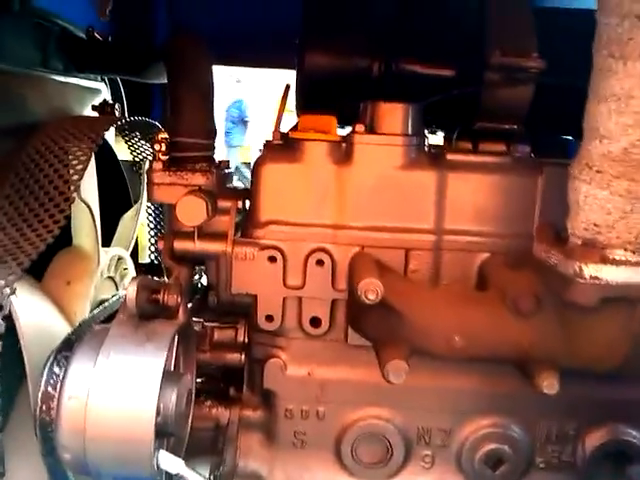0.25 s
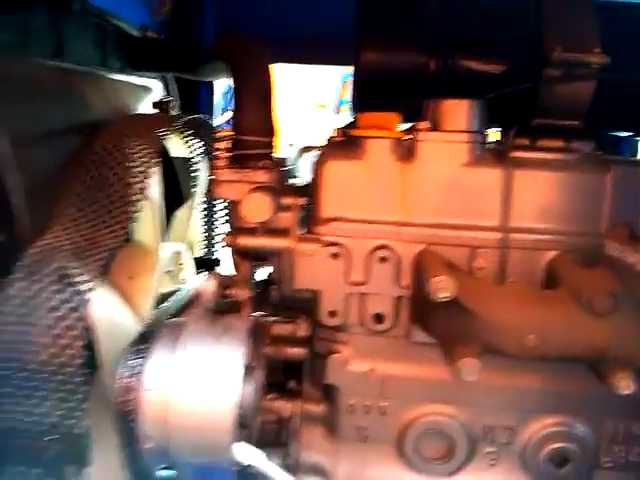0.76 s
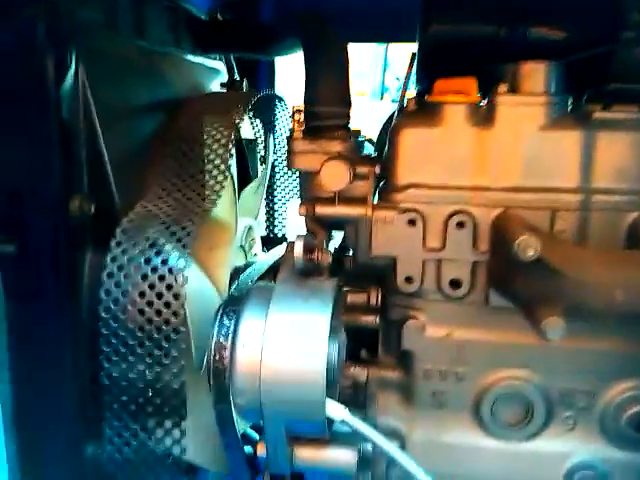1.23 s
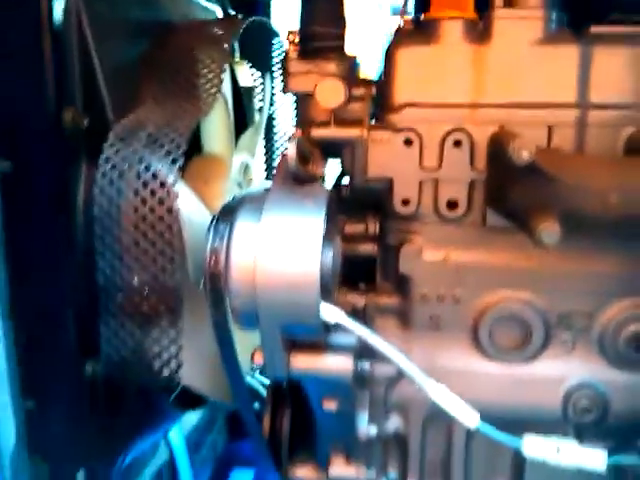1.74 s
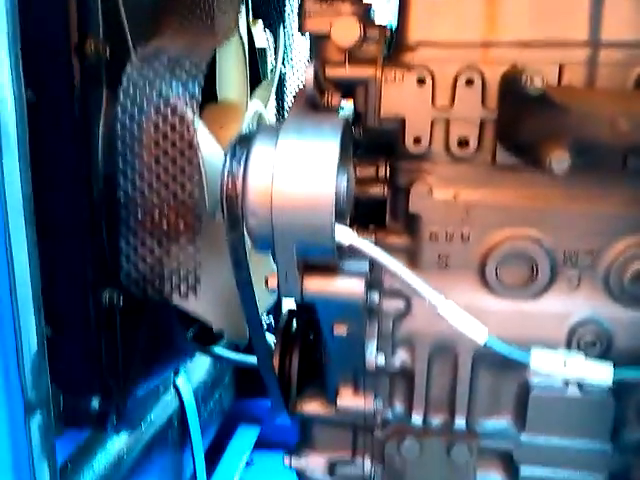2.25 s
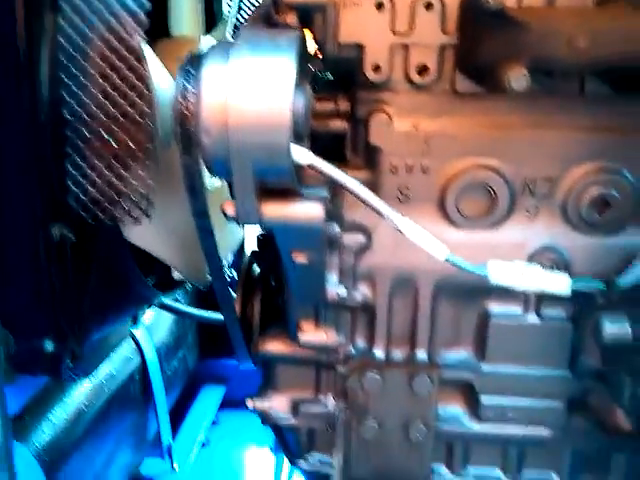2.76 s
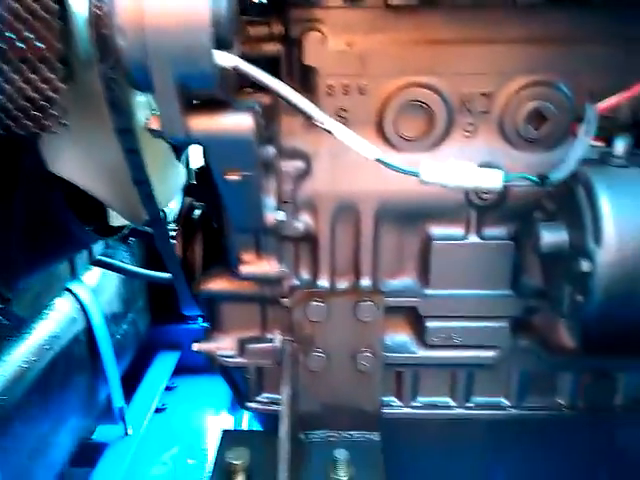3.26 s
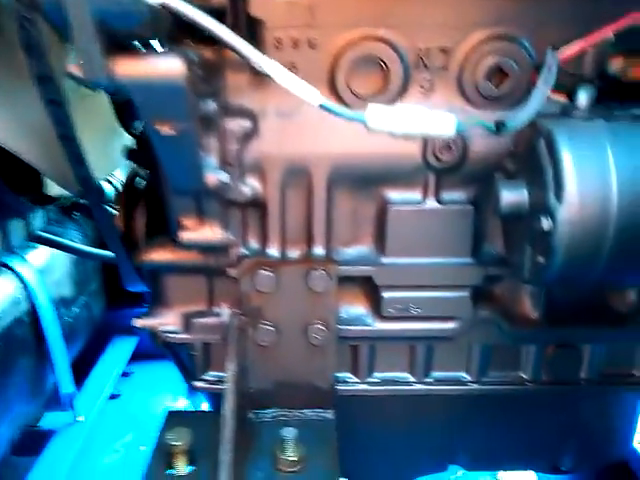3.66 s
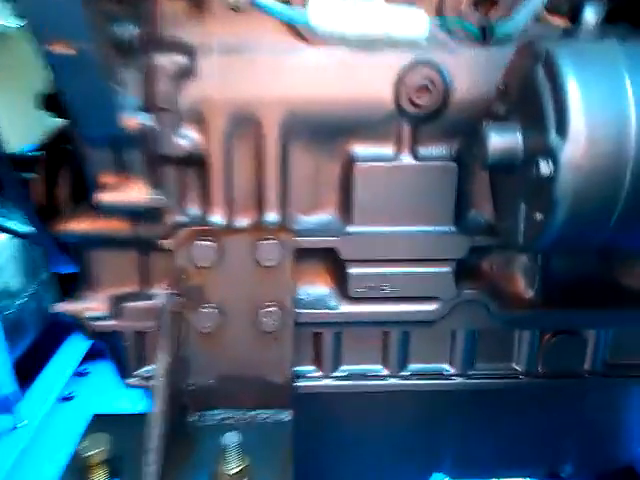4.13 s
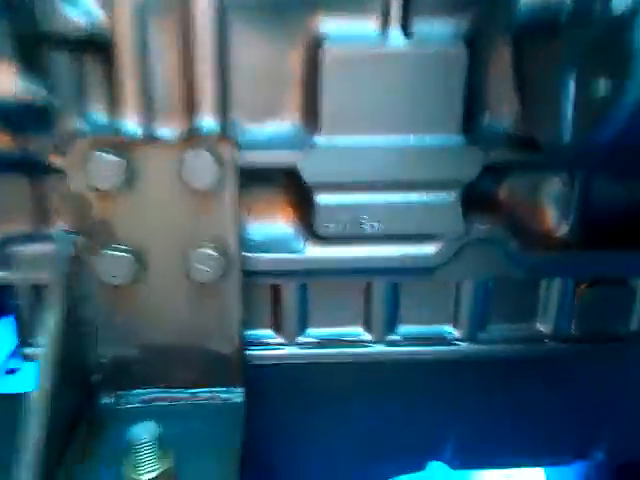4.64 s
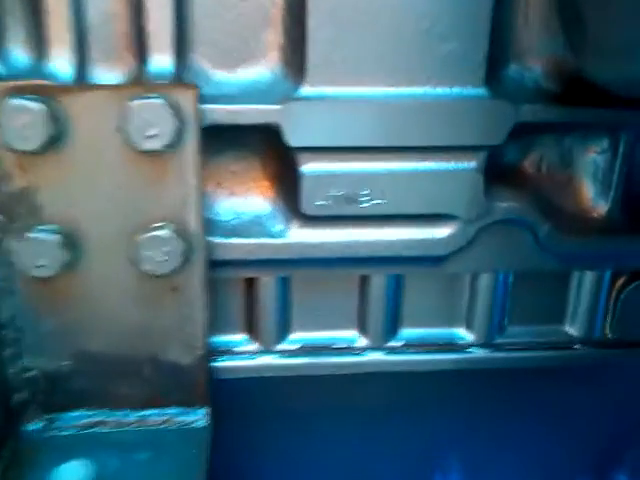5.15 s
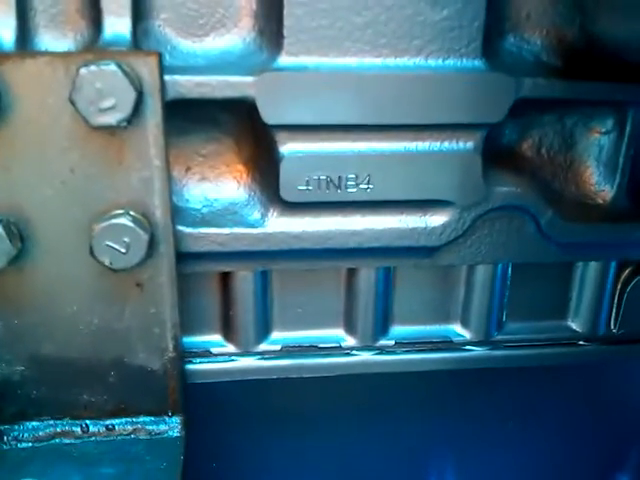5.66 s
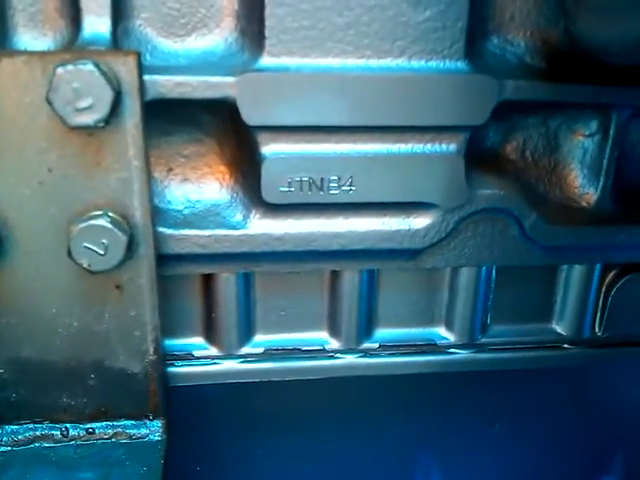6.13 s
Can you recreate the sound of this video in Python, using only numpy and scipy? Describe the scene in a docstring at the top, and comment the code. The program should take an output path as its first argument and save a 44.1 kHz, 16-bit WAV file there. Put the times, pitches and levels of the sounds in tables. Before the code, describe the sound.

A diesel engine idles evenly in a hall, its fast metal ticks rattling in groups of three about fourteen times a second. Behind it lies a steady fan-like noise wash and a deep hum that creeps upward, swelling and sinking, then weakening. Soft knocks join in. Past the middle, a shoe scrapes gritty floor right by the microphone, sharp and crackling. The slightly dull handheld microphone moves along the engine, so the ticking changes colour.

```python
"""A diesel engine idles evenly in a yard hall: tones locked to the exhaust puffs, and three metal ticks each
crank turn, made by noise rattles ringing casing modes as the microphone moves along the engine.
Behind it lies a steady noise wash; nearby, a deeper hum of two tones creeps up in pitch and swells and sinks,
weaker later. Noise-burst knocks and low swings join the ticks, and a shoe scuffs gritty floor close to the
microphone: ringing grains, with single cracks for the larger grit."""
import sys
import numpy as np
from scipy import signal
from scipy.io import wavfile
from scipy.ndimage import uniform_filter1d

SR = 44100
rng = np.random.default_rng(int(sys.argv[2]) if len(sys.argv) > 2 else 0)


def persist_wave(psi):
    """Save psi, clipped to +-1, as 16-bit WAV."""
    counts = np.round(np.clip(psi, -1, 1) * 32767).astype(np.int16)
    wavfile.write(sys.argv[1], SR, np.atleast_2d(counts).T)


N = 281799  # samples

# Colour of the wash in the hall: pitch_hz, relative level_db per Hz
WASH = [(8.8, -30), (15, -1), (66, -7), (120, -15), (235, -18.5), (275, -21), (339, -20.5), (632, -21),
        (1270, -23.5), (2380, -30.5), (3000, -28), (3330, -32.5), (4550, -34), (6540, -42), (7450, -48),
        (9680, -68.5), (16400, -120)]
# Broad lifts in the wash: centre_hz, width_hz, lift_db
HALL = [(348, 42, 7.5), (471, 49, 6), (2020, 230, 2.5), (3050, 110, 2.5), (3860, 330, 2), (6850, 1860, 9)]
# Slow swell of the wash: time_s, low_db (times 1.5 under 1 kHz, 0.5 over 2 kHz), treble_db (full over 2 kHz)
WASH_SWELL = [(0, -1.5, 0), (.7, -0.5, -1), (1.3, -1.5, 1.5), (1.9, 0.5, 1.5), (2.5, 0, -0.5), (3, -0.5, 1),
              (3.6, -0.5, -1.5), (4.2, -1.5, 1.5), (4.9, -1, -1.5), (5.5, -0.5, 1), (6.39, 0, -1)]
# The hum swells and sinks several times, weaker later: time_s, low_tone_db (rms), upper_tone_db (rms)
HUM = [(0, -39, -56), (.2, -43.5, -51.5), (.55, -36, -58.5), (1.3, -44, -53), (1.8, -40.5, -59),
       (2.2, -39, -57), (2.8, -44, -65), (3.4, -45.5, -76), (3.7, -48, -67), (4.05, -44.5, -56),
       (4.5, -45, -63), (5.1, -60.5, -62), (5.6, -52.5, -58), (5.95, -49, -55), (6.39, -52, -61)]
# Low bumps: centre_s, peak_db, pitch_hz
BUMPS = [(2.896, -40, 44.5), (3.95, -34.5, 41.13)]
# Broad knocks, some together with a tick: start_s, level_db (rms before the fade), centre_hz
KNOCKS = [(1.279, -47.5, 3840), (1.812, -51, 4700), (2.374, -53.5, 4500), (2.9492, -53, 1000),
          (2.958, -55, 5000), (3.539, -50, 3000), (4.124, -54.5, 3040)]
# The sole catches three times, then slides: time_s, hiss_db, sole_rumble_db
SCUFF = [(4.518, -86, -60), (4.524, -45.5, -54.5), (4.545, -52, -49.5), (4.565, -45.5, -43.5),
         (4.585, -54, -66), (4.602, -43.5, -54), (4.618, -50.5, -52), (4.651, -39, -57),
         (4.655, -38.5, -53), (4.677, -30.5, -59), (4.685, -42.5, -50.5), (4.71, -37, -59),
         (4.735, -35.5, -56), (4.77, -41, -47), (4.799, -44, -47.5), (4.81, -53, -55), (4.85, -66, -70)]
# Larger grit cracking under the sole: start_s, level_db, pitch_hz
GRIT = [(4.5228, -40, 5500), (4.5597, -33, 5270), (4.596, -23.5, 5900), (4.603, -24, 5900),
        (4.6038, -27.5, 3050), (4.626, -42, 5560), (4.639, -29, 3500), (4.6431, -19, 6000),
        (4.655, -16.5, 5500), (4.658, -21, 5500), (4.6637, -18, 5640), (4.6693, -22, 5930),
        (4.6732, -22, 5200), (4.702, -31, 4080), (4.7158, -37, 2630), (4.7357, -25, 3180),
        (4.737, -21, 4840), (4.752, -30, 3580), (4.7688, -24, 2400), (4.797, -39, 4500)]
# Modes of sole and floor: pitch_hz, width_hz, relative level_db
SOLE = [(159, 30, -6), (318, 32, 1.5), (493, 45, -0.5), (536, 27, -4), (724, 160, -2), (957, 63, -5)]
# Exhaust tones as multiples of the crank turn
MULTIPLES = [2, 4, 5, 6, 8, 9, 10, 11, 12, 14, 15, 16, 17, 18, 19, 21, 23]
# Each exhaust tone: start_level_db (rms), change_db_per_s as the microphone moves
ORDERS_DB = [(-66, 0.5), (-58.5, 0), (-60.5, 0.2), (-61, 0.17), (-70, 0), (-72, -2), (-69, 0),
             (-63.5, 0.74), (-76, -0.5), (-78, -2), (-85.5, 1.5), (-65, -0.6), (-81.5, 2), (-85.5, 1.5),
             (-87, 1.46), (-83, 0.5), (-76.5, 0.5)]
# Place of each of the three ticks within the crank turn: place_turns
TICK_AT = [.522, .652, .787]
# Ticks as the microphone moves along the engine:
# time_s, first_tick_db, last_tick_db, brightness_db_per_octave (about 3400 Hz)
TICKS = [(0, -54, -58, -10), (.25, -44.5, -61, -9), (.72, -58, -52.5, -2.5), (.88, -45, -50, -1),
         (1.1, -48.5, -56, -0.5), (1.4, -52.5, -56, -0.5), (1.65, -48.5, -64, -0.5), (1.8, -52, -47.5, -1),
         (2.4, -51.5, -54.5, 0.5), (3.25, -53, -51, -4), (3.5, -51, -59, -4.5), (4.0, -54, -67, 4),
         (4.35, -48.5, -57.5, -11), (5.0, -54.5, -61.5, 3.5), (5.55, -51.5, -62, 6.5), (6.0, -54, -70, 6),
         (6.39, -53, -57, 4)]
# Modes of the engine's casing: pitch_hz, width_hz (per smoothing pass), relative level_db,
# panel_number (0 sump, 1 side cover, 2 block, 3 a panel whose facing stays constant)
METAL = [(1842, 95, -14, 0), (2140, 190, -10.5, 0), (2677, 180, -9.5, 1), (3060, 220, -7.5, 2),
         (3682, 220, -6.5, 3), (4460, 300, -5, 3), (4740, 280, -8.5, 3), (5500, 400, -10.5, 3),
         (6040, 550, -8.5, 3), (6590, 700, -8, 3)]
# How well three panels face the moving microphone: time_s, sump_db, side_cover_db, block_db
FACING = [(0, -8, -7.5, -7), (.8, -11, 0.5, 2), (1.45, -11, 2.5, 5), (2, -1, 2.5, -2), (3, -4.5, 2, 3.5),
          (3.6, 6.5, 4.5, 5.5), (4.4, -4, -4.5, 2), (5.1, 10.5, 4.5, 6.5), (5.55, 13.5, 9, 6.5),
          (5.9, 15, 6, 6), (6.39, 11, 1, -5)]
# Ticks that stand out: start_s, level_db, lower_ring_hz, upper_ring_hz, upper_against_lower_db
LOUD = [(0.178, -53.5, 2740, 4340, 1), (0.249, -52.5, 2710, 3820, 3), (0.32, -52, 2940, 3770, -12),
        (0.8778, -49.5, 2920, 3900, 2), (0.898, -50, 3000, 4550, 0), (0.9524, -52, 3690, 4650, 0),
        (0.9687, -58, 3200, 4730, 7), (1.0198, -55, 2880, 3670, -14), (1.0386, -53, 2730, 4800, -0.5),
        (1.0902, -51, 2910, 4540, -5), (1.158, -50, 2920, 4350, -11), (1.2318, -44.5, 2880, 3750, -9.5),
        (1.3704, -49.5, 3170, 4400, -7), (1.3923, -58, 3080, 4320, -4), (1.441, -54, 3020, 4310, 0),
        (1.742, -49.5, 3620, 4450, -2), (1.951, -50, 3000, 3700, -7), (2.163, -50, 2980, 4220, -3),
        (2.2354, -51, 3600, 4250, 1), (2.325, -55.5, 2030, 4360, 5), (2.447, -57, 2540, 3660, -1),
        (2.5157, -48.5, 2940, 4120, -7), (2.586, -53, 2960, 3400, -5), (2.8496, -48.5, 2800, 4600, -6),
        (3.2883, -54, 3060, 3730, -5), (3.365, -52, 3260, 3560, -10), (3.4817, -50, 2860, 4400, -15),
        (3.625, -50, 2950, 4720, -11), (3.6909, -51, 2060, 4300, -1.5), (3.8332, -61, 2830, 4770, 6),
        (3.901, -47, 2830, 4470, -27), (4.0436, -54.5, 2980, 3780, -3), (4.1855, -46.5, 2870, 4330, -16),
        (4.324, -46.5, 2970, 4730, -9.5), (5.0995, -55, 2810, 4840, 1), (5.31, -52, 3130, 4740, 1),
        (5.3813, -47, 2790, 3810, -10), (5.4493, -47, 2950, 6440, -11), (5.5183, -51, 2640, 4480, -3),
        (5.5903, -46, 3060, 3380, -6), (5.6614, -52, 1930, 3550, -7), (5.7325, -50, 2950, 6230, -8),
        (5.8729, -49, 2220, 3940, -1), (5.942, -49.5, 3190, 3900, -5), (6.0114, -47.5, 3230, 3890, -11),
        (6.0813, -56, 2060, 3840, -1), (6.153, -51, 2600, 4700, -13), (6.295, -45.5, 2210, 4720, -8.5),
        (6.3644, -49.5, 3070, 3900, -12)]

WASH_DB = -53  # rms of the whole wash
CLIMB_S = 3.6  # time constant of the hum's climb
HUM_FROM_HZ, HUM_TOWARD_HZ = 47.35, 53.46
UPPER_FROM_HZ, UPPER_TOWARD_HZ = 73, 86.3
WAVER_HZ = .15  # rms wander of both hum tones
KNOCK_T60_S = 0.29
SLIDE_HZ, SLOWING_S = (5600, 2730), (4.698, 4.78)  # slide brightness before and after the foot slows
CRANK_HZ = 14.2254
PUFF_AT, PUFF_LEAD = .61, .32  # turns: place of the one puff a turn, and the lead of its swing
TICK_SPREAD_DB = 1.5  # rms chance in each tick's level
MIDDLE_DB = 0.5  # the middle tick against the mean of the others
FOCUS_DB = -36.5  # per octave: how fast modes fall silent away from a loud tick's rings
REPEAT_DB = -4.5  # the last tick answering a loud first tick on the same rings
EDGE_HZ = 7560  # band limit
OFFSET = .0009  # of full scale


def gain_of(db):
    """Decibels to gain."""
    return 10 ** (np.asarray(db) / 20)


def evened(x):
    """Scales to rms 1."""
    return x / np.sqrt(np.mean(x ** 2) + 1e-20)


def curves(rows, t):
    """Columns of a table read at times t, with straight lines between rows."""
    s, *columns = np.transpose(rows)
    return [np.interp(t, s, c) for c in columns]


def drift(rate_hz, t):
    """Slow wander of rms 1: sines of random phase up to the given rate, the slower ones stronger."""
    rates = np.geomspace(rate_hz / 20, rate_hz, num=20)
    return evened(sum(np.sin(2 * np.pi * (f * t + rng.random())) / np.sqrt(f) for f in rates))


def resonate(x, hz, width_hz):
    """Shifts hz down to zero, smooths, and shifts back: a resonance of gain 1."""
    turn = np.exp(2j * np.pi * np.cumsum(hz * np.ones(len(x))) / SR)
    r = np.exp(-np.pi * width_hz / SR)
    return 2 * (turn * signal.lfilter([1 - r], [1, -r], x / turn)).real


def add(mix, start_s, sound):
    """Mixes a sound in from start_s, cut at the end of the mix."""
    part = mix[round(start_s * SR):][:len(sound)]
    part += sound[:len(part)]


def blurred(x, bins, frames):
    """Random patches of rms 1, averaged over neighbouring frequency bins and time frames."""
    x = uniform_filter1d(x, size=bins, axis=0)
    return evened(uniform_filter1d(x, size=frames, axis=1))


def wash():
    """Fan and engine noise spread by the hall: random spectra with drifting patches."""
    frames, hz = N // 512 + 5, np.fft.rfftfreq(2048, 1 / SR)
    a, b, patches, bands = rng.standard_normal((4, len(hz), frames))
    patches = blurred(patches, 14, 10)
    bands = blurred(bands, 2, 40)  # narrow bands that linger

    f, db = np.transpose(WASH)
    colour = np.interp(np.log(hz + 1), np.log(f + 1), db)
    colour += sum(lift / (1 + (2 * (hz - centre) / width) ** 2) for centre, width, lift in HALL)

    low_db, high_db = curves(WASH_SWELL, np.arange(frames) * 512 / SR)
    treble = np.clip(np.log2((hz + 1) / 1000), 0, 1)[:, None]  # 0 under 1 kHz, 1 over 2 kHz
    swell = (1.5 - treble) * low_db + treble * high_db
    flicker = 1.7 * treble * patches + (2.2 + 1.1 * treble) * bands
    spectra = (a + 1j * b) * gain_of(colour[:, None] + swell + flicker)
    noise = signal.istft(spectra, nperseg=2048, noverlap=1536)[1][:N]
    return gain_of(WASH_DB) * evened(noise)


def hum(t):
    """Two tones creeping up in pitch, each slowing toward its goal; the lower has a faint octave."""
    db, upper_db = curves(HUM, t)
    climb, waver = 1 - np.exp(-t / CLIMB_S), WAVER_HZ * drift(3., t)
    low_hz = HUM_FROM_HZ + (HUM_TOWARD_HZ - HUM_FROM_HZ) * climb + waver
    upper_hz = UPPER_FROM_HZ + (UPPER_TOWARD_HZ - UPPER_FROM_HZ) * climb + waver
    low_phase = 2 * np.pi * np.cumsum(low_hz) / SR
    upper_phase = 2 * np.pi * np.cumsum(upper_hz) / SR

    low = np.sin(low_phase) + gain_of(-25.5) * np.sin(2 * low_phase)
    low *= gain_of(db + 1.1 * drift(15.0, t))
    upper = gain_of(upper_db + 0.99 * drift(2.3, t)) * np.sin(upper_phase)
    return np.sqrt(2) * (low + upper)


def bump(db, hz):
    """A single low swing under a bell-shaped envelope, centred 2000 samples in."""
    u = np.arange(-2000, 2000) / SR
    return -gain_of(db) * np.cos(2 * np.pi * hz * u) * np.exp(-(u / 0.0091) ** 2)


def knock(db, hz):
    """A broad noise burst with a sharp front that dies in the hall."""
    u = np.arange(round(.3 * SR)) / SR
    burst = evened(resonate(rng.standard_normal(len(u)), hz, 0.55 * hz))
    return gain_of(db - 60 * u / KNOCK_T60_S) * np.minimum(u / 0.00075, 1) * burst


def grit_crack(db, hz):
    """One larger piece of grit: a very short ping with a fading puff of noise."""
    u = np.arange(300) / SR
    ping = np.sin(2 * np.pi * hz * u) * np.exp(-((u - .0007) / 0.00017) ** 2)
    puff = 0.084 * rng.standard_normal(len(u)) * np.exp(-u / 0.0015)
    return gain_of(db) * (ping + puff)


def scuff():
    """Dense fine grains under a sliding sole: the brightness falls as the foot slows; larger grit cracks singly."""
    t = np.arange(SCUFF[0][0], SCUFF[-1][0], 1 / SR)
    db, sole_db = curves(SCUFF, t)
    bright_hz = np.interp(t, SLOWING_S, SLIDE_HZ)

    grain_db = 2.8 * np.minimum(rng.exponential(1, len(t)), 3.5)
    falls = rng.random(len(t)) < 7000 / SR  # about 7000 grains per second
    grains = rng.standard_normal(len(t)) * gain_of(grain_db) * falls

    # bits of grit ring by turns
    stones = sum(gain_of(2.8 * drift(200., t)) * resonate(grains, f, 450.0)
                 for f in np.geomspace(1700, 7000, num=16))
    hiss = evened(resonate(stones, bright_hz, 2200.) + .25 * stones)
    sole = evened(sum(gain_of(mode_db + 2.0 * drift(20., t)) * resonate(grains, f, width) / np.sqrt(width)
                      for f, width, mode_db in SOLE))

    out = np.zeros(N)
    add(out, t[0], gain_of(db) * hiss + gain_of(sole_db) * sole)
    for start_s, *row in GRIT:
        add(out, start_s, grit_crack(*row))
    return out


def exhaust(t):
    """Tones locked to one puff each crank turn, so that they beat in step; multiples of six swing the other way."""
    turn = CRANK_HZ * t - PUFF_AT + .005 * drift(1., t)
    out = np.zeros(len(t))
    for k, (db, db_per_s) in zip(MULTIPLES, ORDERS_DB):
        level = np.sqrt(2) * gain_of(db + db_per_s * t + 0.94 * drift(1.4, t))
        sign = 1 if k % 6 else -1
        out += level * sign * np.cos(2 * np.pi * (k * turn + PUFF_LEAD))
    return out


def rattle():
    """Loudness of a rattle: quick rise, quick fall, faint tail."""
    u = np.arange(2600) / SR
    return np.minimum(u / 0.0012, 1) * (gain_of(-60 * u / 0.014) + gain_of(-14 - 60 * u / 0.2))


def ring(drive, hz, width_hz):
    """One mode of the casing: two passes of resonance give it steep skirts."""
    return resonate(resonate(drive, hz, width_hz), hz, width_hz) * np.sqrt(SR / (np.pi * width_hz))


def clatter():
    """Each tick is a short rattle of noise into the casing; which modes answer changes from turn to turn."""
    turns = np.arange(int(N / SR * CRANK_HZ) + 1)
    slow = evened(uniform_filter1d(rng.standard_normal((len(turns), len(METAL))), size=2, axis=0))
    noise, out = rng.standard_normal(N), np.zeros(N)
    # per turn and tick: one draw for each mode, then one for level and one for timing
    chance = rng.standard_normal((len(turns), len(TICK_AT), len(METAL) + 2))
    at_s = (turns[:, None] + np.array(TICK_AT) + 0.0054 * chance[..., -1]) / CRANK_HZ

    first, last, bright = curves(TICKS, at_s)
    panels = curves(FACING, at_s) + [0]
    middle = (first + last)[:, 1] / 2 + MIDDLE_DB
    tick_db = np.stack([first[:, 0], middle, last[:, 2]], axis=1)
    tick_db += TICK_SPREAD_DB * chance[..., -2]

    for m, (hz, width, mode_db, panel) in enumerate(METAL):
        share_db = mode_db + panels[round(panel)] + bright * np.log2(hz / 3400)
        share_db = share_db + 2.7 * slow[:, [m]] + 0.68 * chance[..., m]
        blows = np.zeros(N + SR)
        blows[np.round(at_s * SR).astype(int)] = gain_of(tick_db + share_db)
        rattling = noise * signal.oaconvolve(blows, rattle())[:N]
        out += ring(4.6 * blows[:N] + rattling, hz, width)
    return out


def loud_tick(start_s, db, low_hz, high_hz, high_db):
    """A harder tick: blow and a longer rattle ring two spots of the casing and wake the modes near them."""
    shape = rattle() + gain_of(-6.5 - 60 * np.arange(2600) / SR / .13)
    noise, blow = rng.standard_normal(2600), 4.5 * (np.arange(2600) == 20)
    drive = shape * noise + blow
    if abs(start_s * CRANK_HZ % 1 - TICK_AT[0]) < .1:  # a first tick: the last tick of the turn answers
        lag = round((TICK_AT[-1] - TICK_AT[0]) / CRANK_HZ * SR)
        drive[lag:] += gain_of(REPEAT_DB) * (rattle()[:-lag] * noise[lag:] + blow[:-lag])

    out = ring(drive, low_hz, 210.0) + gain_of(high_db) * ring(drive, high_hz, 350.)
    for hz, width, mode_db, _ in METAL:
        away_octaves = np.abs(np.log2(hz / np.array([low_hz, high_hz])))
        woken = gain_of(FOCUS_DB * away_octaves + [0, high_db]).sum()
        out += gain_of(mode_db) * woken * ring(drive, hz, width)
    # the level is set against the peak of a wider ring at the lower spot
    return gain_of(db) * out / np.abs(ring(drive, low_hz, 470.0)).max()


def scene():
    """All sources at the microphone, as one channel."""
    t = np.arange(N) / SR
    mix = wash() + hum(t) + scuff() + exhaust(t) + clatter()
    for centre_s, *row in BUMPS:
        add(mix, centre_s - 2000 / SR, bump(*row))
    for start_s, *row in KNOCKS:
        add(mix, start_s, knock(*row))
    for start_s, *row in LOUD:
        add(mix, start_s, loud_tick(start_s, *row))
    return mix[None]


def record(dry):
    """The microphone rolls off its treble; a small steady offset, then the band limit."""
    dulled = signal.sosfilt(signal.butter(8, 6900, fs=SR, output="sos"), dry)
    band_limit = signal.firwin(511, EDGE_HZ, window=("kaiser", 9), fs=SR)
    return signal.oaconvolve(dulled + OFFSET, band_limit[None], "same")


dry = scene()
out = record(dry)
persist_wave(out)
```